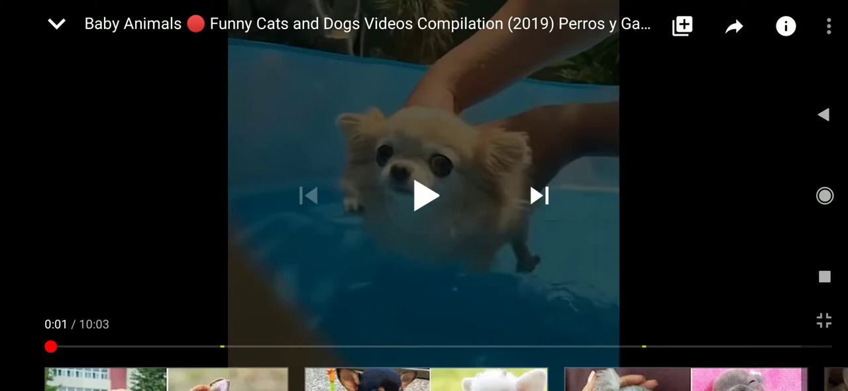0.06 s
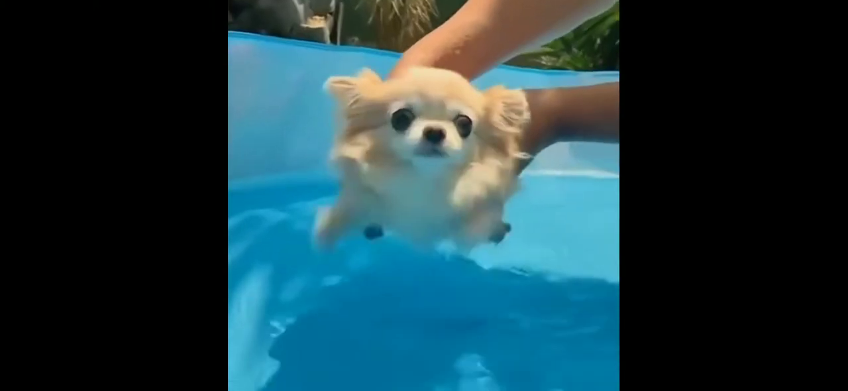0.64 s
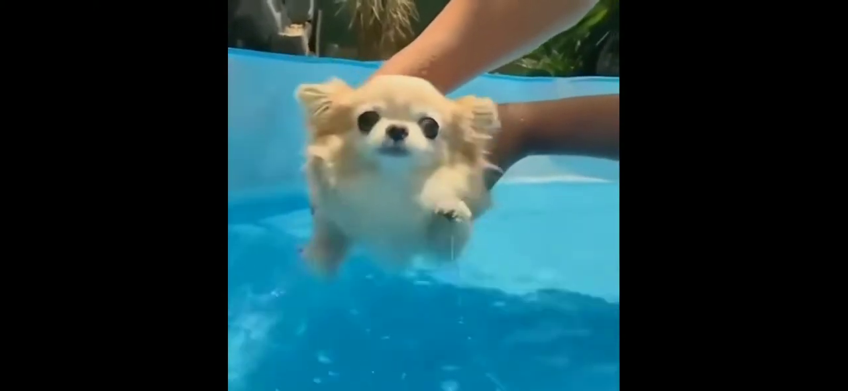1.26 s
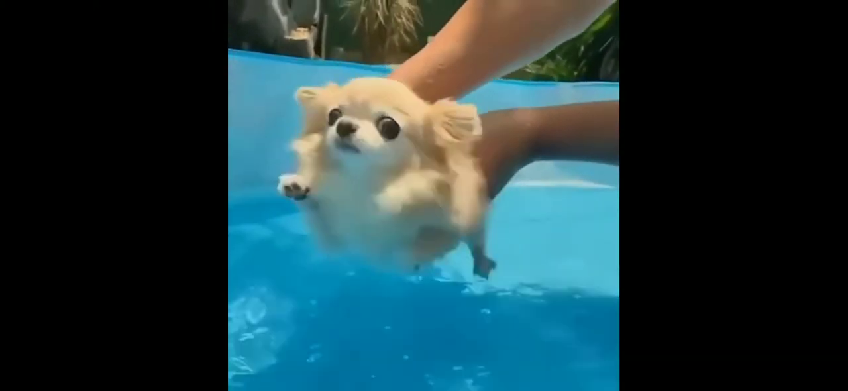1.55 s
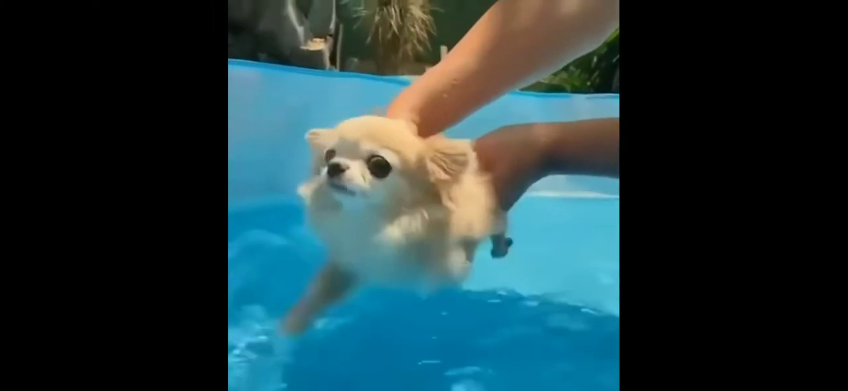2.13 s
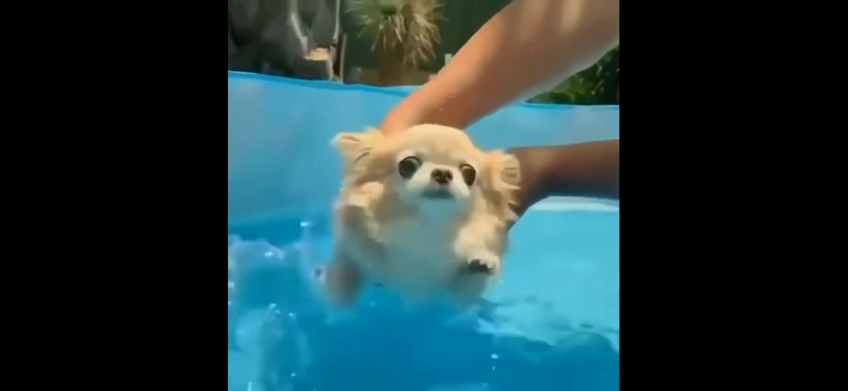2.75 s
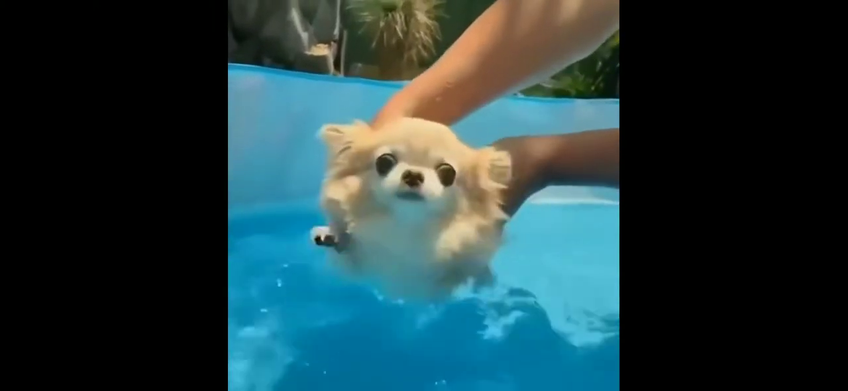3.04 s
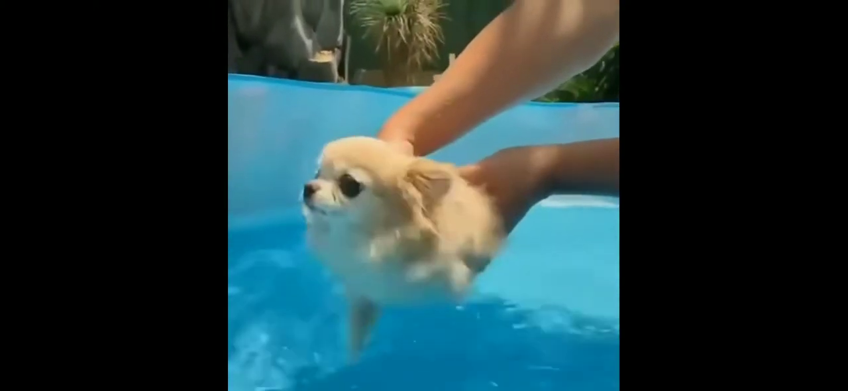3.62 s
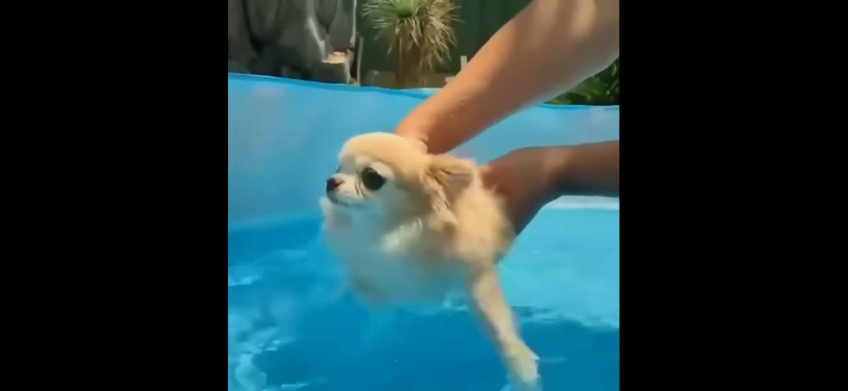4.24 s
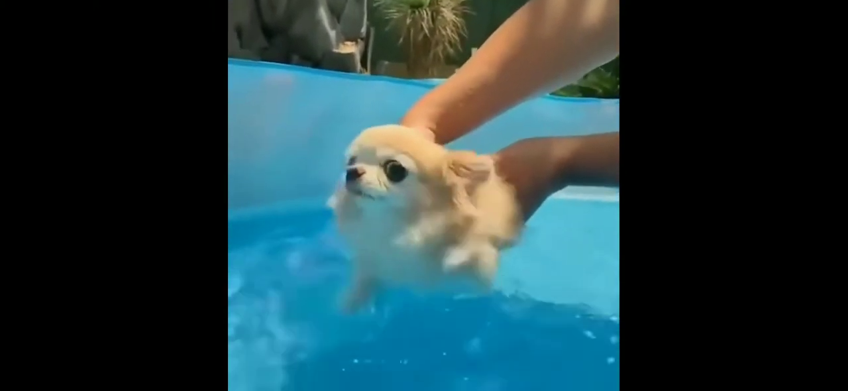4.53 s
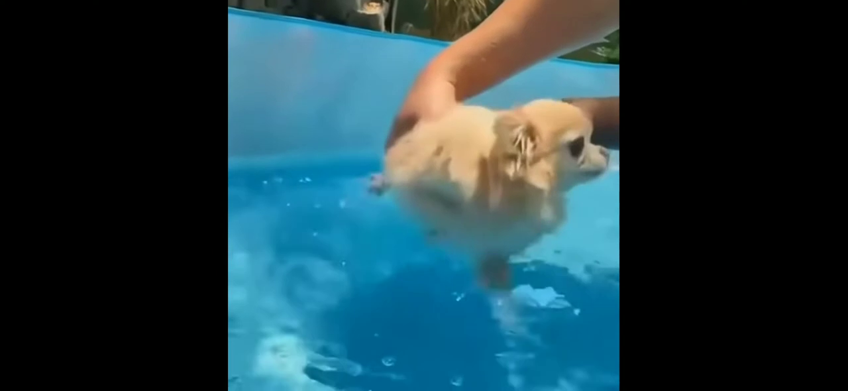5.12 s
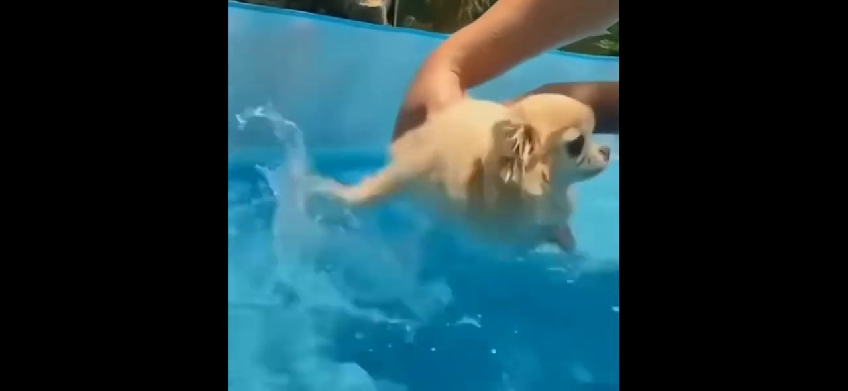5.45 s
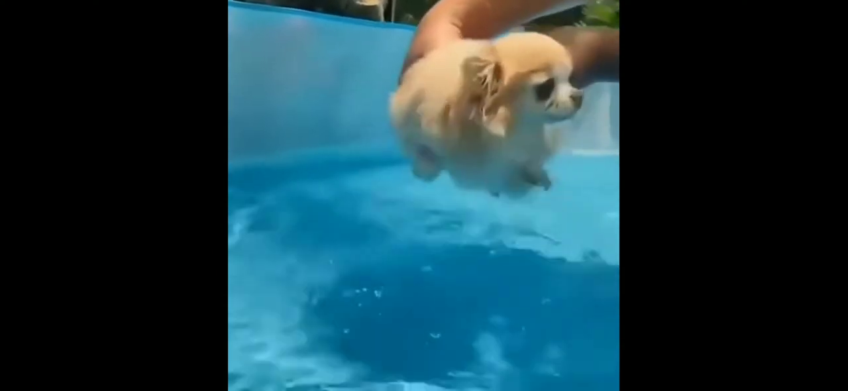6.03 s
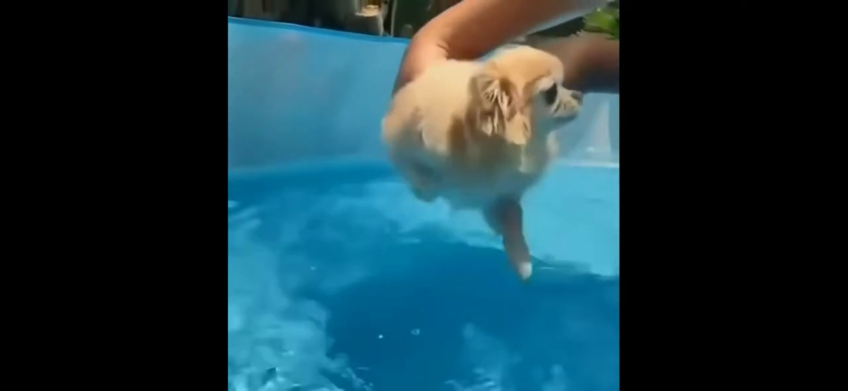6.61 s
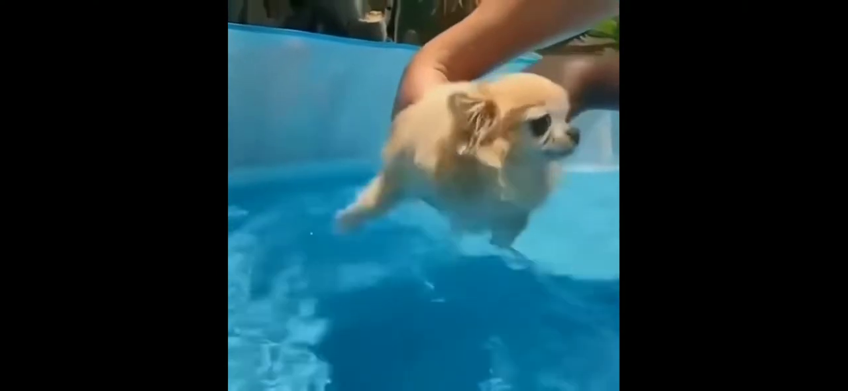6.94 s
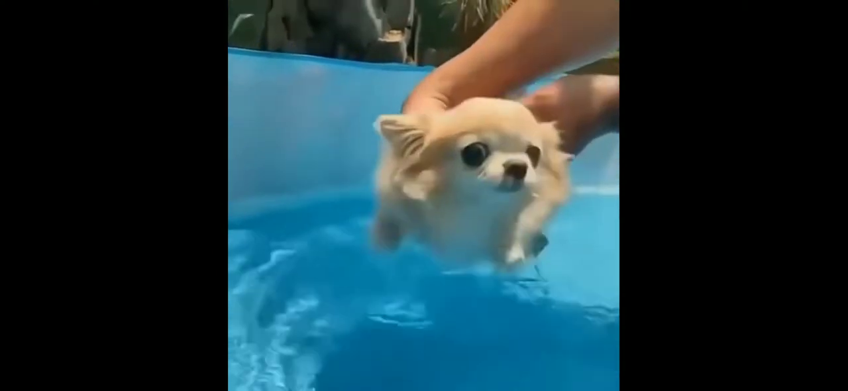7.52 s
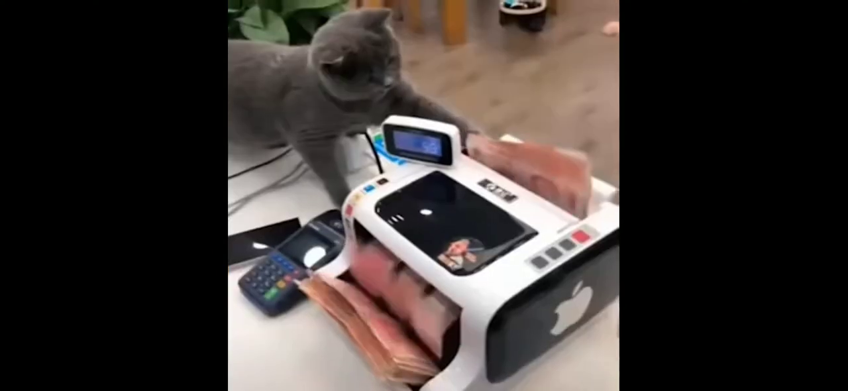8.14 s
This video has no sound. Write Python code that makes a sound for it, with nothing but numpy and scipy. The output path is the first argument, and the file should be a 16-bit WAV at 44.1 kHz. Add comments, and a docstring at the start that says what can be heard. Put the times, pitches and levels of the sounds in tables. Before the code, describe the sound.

Close to the microphone, a small dog paddles at the surface of a garden pool. Its paws make light, irregular slaps, with bubbly plops, falling spray and drips from wet fur. Far traffic and one engine rumble faintly behind. The splashing grows busier past the middle, then eases. Near the end the sound cuts abruptly to a nearby banknote counter, briefly riffling paper over a motor hum.

```python
"""A small dog paddles at the surface of a garden pool, held over the water close to the microphone.
Paws slap, thrown spray falls back, trapped air rings as bubbles and the wet fur drips.
The pool walls answer at once; far behind lie a low traffic rumble and one engine.
At 7.7 s the scene changes abruptly to a banknote counter at close range:
its motor hums while paper riffles through the rollers. One microphone, mono."""
import sys
import numpy as np
from scipy import signal
from scipy.fft import rfft, irfft
from scipy.io import wavfile
from scipy.ndimage import uniform_filter1d

SR = 44100
rng = np.random.default_rng(int(sys.argv[2]) if len(sys.argv) > 2 else 0)


def persist_wave(psi):
    """Save psi, clipped to +-1, as 16-bit WAV."""
    counts = np.round(np.clip(psi, -1, 1) * 32767).astype(np.int16)
    wavfile.write(sys.argv[1], SR, np.atleast_2d(counts).T)


N = 369116
TIME = np.arange(N) / SR


# Paws and flung water hitting the surface, close by: start_s, level_db, t60_s
PAW_SLAPS = [(0.744, -53.5, .023), (0.926, -43.5, .01), (1.029, -40, .022), (1.152, -49.5, 0.032),
             (1.579, -52, 0.033), (1.772, -51, 0.011), (1.866, -53.5, 0.036), (2.2401, -46.5, 0.044),
             (2.423, -48, 0.044), (2.644, -52.5, 0.033), (2.9318, -38, 0.011), (3.234, -44, 0.03),
             (3.636, -53.5, 0.055), (3.691, -51.5, 0.043), (3.812, -52, 0.037), (4.1437, -33, 0.0085),
             (4.217, -48.5, 0.056), (4.45, -49, 0.022), (4.5995, -33.5, 0.02), (4.99, -34.5, 0.02),
             (5.085, -41.5, .044), (5.241, -45.5, 0.048), (5.404, -43, 0.086), (5.518, -39.5, 0.024),
             (5.724, -43.5, .021), (5.758, -43, 0.044), (5.885, -40.5, 0.068), (6.03, -49, .022),
             (6.063, -44, .033), (6.368, -41, 0.017), (6.531, -46, 0.038), (6.931, -51, 0.032),
             (7.251, -48, .042)]

def paw_slaps(tail_db=-25, tail_t60=0.51, attack_s=0.00019, neutral_t60=0.027):
    """A ragged crack as the surface breaks, then a faint tail; longer slaps sound darker."""
    out, t = np.zeros(N), np.arange(SR // 4) / SR
    for start_s, db, t60 in PAW_SLAPS:
        grain = amp(-unit(uniform_filter1d(rng.standard_normal(len(t)), size=60)))
        tilt_db = -5 * np.log2(t60 / neutral_t60)
        burst = coloured(rng.standard_normal(len(t)) * grain, SPRAY_SPECTRUM, tilt_db)
        decay = amp(-60 * t / t60) + amp(tail_db - 60 * t / tail_t60)
        shape = decay * (1 - np.exp(-t / attack_s))
        add(out, start_s, amp(db) * unit(burst * shape) * np.sqrt(2 * np.mean(shape ** 2)))
    return out


# Paw strokes sweeping water aside: start_s, length_s, gurgle_db, spray_db
PAW_STROKES = [(0.767, 0.039, -52.5, -51), (0.967, 0.15, -94, -61), (1.159, .12, -62.5, -60.5),
               (1.336, 0.049, -81, -61), (2.17, 0.05, -60.5, -64.5), (2.274, 0.061, -86, -62),
               (2.49, 0.033, -63, -57), (2.739, 0.074, -66.5, -59), (2.965, 0.033, -71, -54.5),
               (3.135, 0.012, -58, -66), (3.341, 0.031, -55, -60.5), (3.388, 0.023, -50, -56),
               (3.427, 0.071, -78, -56.5), (3.546, 0.039, -83, -60), (3.84, 0.017, -79, -57.5),
               (3.932, 0.013, -62, -58.5), (4.029, 0.046, -52, -55.5), (4.274, 0.066, -55.5, -53.5),
               (4.358, 0.085, -60, -53), (4.738, 0.17, -57, -58.5), (4.935, 0.015, -48.5, -54),
               (5.038, 0.11, -57.5, -61), (5.157, 0.012, -47, -55.5), (5.389, 0.069, -56, -57),
               (5.492, 0.08, -52.5, -57), (5.604, 0.073, -58, -71), (5.666, .06, -48.5, -57),
               (5.83, 0.063, -66, -74), (5.867, 0.17, -53, -58.5), (6.073, 0.061, -50, -57.5),
               (6.447, 0.027, -56, -57), (6.527, 0.047, -61.5, -77), (6.713, 0.033, -56.5, -58.5),
               (6.952, 0.1, -51, -57.5)]

def paw_strokes(rise_s=0.004, close_t60=0.12, flight_s=0.17, flight_spread_s=0.077):
    """Gains of spray and gurgle: a paw digs in, the water closes, spray rains back, the wake settles."""
    spray_power, gurgle_power = np.zeros(N), np.zeros(N)
    t = np.arange(2 * SR) / SR
    onset = np.minimum(t / rise_s, 1)
    fallback = amp(-12) ** 2 * np.exp(-((t - flight_s) / flight_spread_s) ** 2)
    wake = (onset * amp(-18 - 13 * t)) ** 2
    for start_s, length_s, gurgle_db, spray_db in PAW_STROKES:
        sweep = (onset * amp(-60 * np.maximum(t - length_s, 0) / close_t60)) ** 2
        add(spray_power, start_s, amp(spray_db) ** 2 * (sweep + fallback + wake))
        add(gurgle_power, start_s, amp(gurgle_db) ** 2 * sweep + amp(spray_db) ** 2 * wake)
    return np.sqrt(spray_power), np.sqrt(gurgle_power)


# The larger air pockets closed by paws and drops: start_s, pitch_hz, level_db
AIR_POCKETS = [(.736, 2340, -41), (0.778, 2570, -40), (1.079, 2890, -33.5), (1.119, 1314, -46),
               (1.175, 1650, -39), (1.234, 1320, -42.5), (1.255, 748, -34.5), (2.161, 1636, -33.5),
               (2.164, 1577, -33), (2.18, 1756, -41), (2.241, 3260, -36), (2.429, 1856, -40.5),
               (2.541, 3260, -47), (2.63, 880, -51), (2.855, 1464, -52), (2.865, 1006, -41),
               (2.883, 1340, -76), (3.155, 2570, -59), (3.338, 1860, -46), (3.39, 764, -48),
               (3.911, 1376, -52), (4.017, 2840, -41), (4.121, 2530, -30.5), (4.087, 1140, -44),
               (4.133, 1440, -30), (4.146, 3060, -26), (4.202, 3270, -35), (4.3, 2110, -26),
               (4.372, 1543, -38.5), (4.479, 457, -35), (4.532, 1847, -40.5), (4.759, 1000, -33),
               (4.769, 1024, -29), (4.82, 1297, -35), (4.86, 1730, -23.5), (4.944, 634, -39.5),
               (4.999, 1980, -33.5), (5.062, 1210, -37), (5.272, 960, -44), (5.282, 412, -39.5),
               (5.401, 1070, -25), (5.407, 1710, -27), (5.431, 836, -41), (5.516, 1550, -40.5),
               (5.556, 1000, -37), (5.62, 470, -45), (5.696, 940, -38), (5.719, 1574, -41),
               (5.76, 1750, -23.5), (5.791, 1080, -48), (5.845, 545, -57), (5.886, 1067, -31.5),
               (5.976, 1340, -36.5), (6.113, 1083, -37.5), (6.159, 3710, -32.5), (6.497, 1190, -35.5),
               (6.536, 2890, -37.5), (6.592, 3580, -39.5), (6.685, 1120, -44.5), (6.786, 1650, -41.5),
               (6.934, 2570, -41), (6.982, 1000, -40.5), (7.039, 1827, -35.5), (7.214, 237, -35),
               (7.257, 2470, -45.5), (7.401, 3550, -54)]
TYPICAL_HZ, TYPICAL_DB = 1450, -37  # the pocket from which ring times and trail levels are scaled

def plops(trail_count=5, lag_s=0.017, climb_octaves_per_s=20, fade_db_per_s=160):
    """Each air pocket rings and breaks into a trail of small bubbles: the later, the higher and fainter."""
    out = np.zeros(N)
    # each air pocket glides up by its own random share
    rises = 0.442 * np.exp(0.58 * rng.uniform(-1.94, 1, len(AIR_POCKETS)))
    for (start_s, hz, db), rise in zip(AIR_POCKETS, rises):
        add(out, start_s, air_pocket(hz, db, rise))
        for late, detune, glide in rng.standard_normal((trail_count, 3)):
            delay_s = lag_s * abs(late)
            small_hz = hz * 2 ** (0.3 * detune + climb_octaves_per_s * delay_s)
            small_db = -50 + 0.68 * (db - TYPICAL_DB) - fade_db_per_s * delay_s
            add(out, start_s + delay_s, bubble(small_hz, small_db, t60=0.025, rise=0.23 * abs(glide)))
    return out


def air_pocket(hz, db, rise, attack_cycles=0.47):
    """One large bubble: a quickly damped burst, then a quiet after-ring that glides up."""
    size_factor = (hz / TYPICAL_HZ) ** -0.36  # smaller bubbles ring shorter
    excess_db = db - TYPICAL_DB
    burst_t60 = 0.03 * size_factor * 2 ** (-excess_db / 11.5)  # so do violently torn ones
    after_db, after_t60 = -45.5 + 0.21 * excess_db, 0.086 * size_factor
    t = np.arange(int(max(burst_t60, after_t60) * SR)) / SR
    decay = np.maximum(amp(db - 60 * t / burst_t60), amp(after_db - 60 * t / after_t60))
    onset = 1 - np.exp(-t * hz / attack_cycles)
    return decay * onset * np.sin(2 * np.pi * hz * (t + rise * t * t / after_t60 / 2))


def bubble(hz, db, t60, rise, attack_s=0.00014):
    """Trapped air rings and dies; its pitch climbs by the share `rise` as it nears the surface."""
    t = np.arange(int(max(t60, 0.005) * SR)) / SR
    envelope = amp(db - 60 * t / t60) * (1 - np.exp(-t / attack_s))
    return envelope * np.sin(2 * np.pi * hz * (t + rise * t * t / t60 / 2))


# Spectrum of splashing water at close range: frequency_hz, relative_db
SPRAY_SPECTRUM = [(500, -28), (1500, -6.5), (3500, 3.5), (6000, 3.5), (10000, -1), (13700, 0), (14500, -42),
                  (16000, -44)]

def spray(fizz_db=-5, drops_db=-6, ring_cycles=18):
    """Fine droplets land, each with a brief pitched tick, over a soft fizz of foam."""
    fizz = coloured(rng.standard_normal(N) * amp(2 * wander(90)), SPRAY_SPECTRUM)
    drops = np.zeros(N)
    for hz in np.linspace(2200, 13500, 30):
        droplet = unit(bubble(hz, 0, ring_cycles / hz, rise=0.023, attack_s=0.00099))
        drops += signal.oaconvolve(ticks(per_s=16, spread_db=4), droplet)[:N]
    return amp(fizz_db) * fizz + amp(drops_db) * coloured(drops, SPRAY_SPECTRUM)


def patter(relative_db=-4, t60=0.013):
    """Drops that trap no air land as dry, broad ticks."""
    t = np.arange(SR // 40) / SR
    power = signal.oaconvolve(ticks(per_s=70, spread_db=3) ** 2, amp(-120 * t / t60))[:N]
    return amp(relative_db) * coloured(rng.standard_normal(N) * np.sqrt(abs(power)), SPRAY_SPECTRUM)


# Spectrum of the water churned around the paws: frequency_hz, relative_db
GURGLE_SPECTRUM = [(300, -30), (600, -10.5), (1050, 3), (2000, 3), (3200, 1.5), (5000, -10.5), (9000, -50)]

def gurgle(swarm_db=-2, wash_db=-8, ring_cycles=28, sizes=40):
    """A swarm of small bubbles in a wash of torn water; smaller ones ring higher and shorter."""
    swarm = np.zeros(N)
    for hz, rise in zip(np.geomspace(450, 5000, sizes), rng.uniform(0, 0.35, sizes)):
        ring = hz * bubble(hz, 0, ring_cycles / hz, rise)
        swarm += signal.oaconvolve(ticks(per_s=30, spread_db=3.2), ring)[:N]
    return amp(swarm_db) * coloured(swarm, GURGLE_SPECTRUM) + amp(wash_db) * noise(GURGLE_SPECTRUM)


def cavities(splash, depth_db=3.5):
    """Cavities of ever changing shape give each instant of a splash its own colour."""
    spectra = signal.stft(splash, nperseg=256, noverlap=192)[2]
    patches = uniform_filter1d(rng.standard_normal(spectra.shape), size=3, axis=0)  # across frequency
    patches = uniform_filter1d(patches, size=13, axis=1)  # across time
    gain = unit(amp(depth_db * unit(patches)))
    return signal.istft(spectra * gain, nperseg=256, noverlap=192)[1][:N]


def fur_drips(from_s=0.8, to_s=7.5, centre_hz=3200, count=75):
    """Water runs off the wet fur into the pool in small, clear plinks."""
    out = np.zeros(N)
    for start_s in rng.uniform(from_s, to_s, count):
        octaves, force = rng.standard_normal(2)
        hz = centre_hz * 2 ** (0.35 * octaves)
        db = -53.5 + 3.5 * min(force, 1)
        add(out, start_s, bubble(hz, db, t60=0.026, rise=0.075))
    return out


# Echoes reaching the microphone from the sides of the pool: delay_s, gain_db
POOL_ECHOES = [(.0027, -45), (.0058, -22.5), (0.01, -15.5)]
# Decay of the open yard: frequency_hz, t60_s
YARD_DECAY = [(1500, 0.048), (14000, 0.05)]

def garden(direct, tail_db=-11, reflections_per_s=2500):
    """The pool walls answer at once, and the yard adds a thin, short tail."""
    taps = rng.choice([-1., 1.], SR // 3) * (rng.random(SR // 3) < reflections_per_s / SR)
    hz, t, spectra = signal.stft(taps, SR, nperseg=256)
    decay = amp(-60 * t / read(YARD_DECAY, hz)[:, None])
    tail = signal.istft(spectra * decay, SR, nperseg=256)[1]
    out = direct + amp(tail_db) * signal.fftconvolve(direct, tail / np.linalg.norm(tail))[:N]
    for delay_s, db in POOL_ECHOES:
        add(out, delay_s, amp(db) * direct)
    return out


# Banknotes flicked into the stacker, close to the microphone: time_s, level_db
NOTE_FLICKS = [(7.759, -47.5), (7.804, -41.5), (7.864, -45), (7.945, -45.5), (8.007, -40.5), (8.069, -44.5),
               (8.189, -41.5), (8.231, -41), (8.252, -40), (8.293, -44.5), (8.348, -41)]
# Spectrum of paper rubbing on the rollers: frequency_hz, relative_db
PAPER_SPECTRUM = [(400, -12), (1050, -10), (1600, -2.5), (2300, -3.5), (3000, -5.5), (4200, 3),
                  (5100, -0.5), (6300, 1), (8000, -4), (10500, -12), (12800, -21.5), (13600, -55)]

def banknotes(rush_db, flick_s=0.0073, drag_s=0.021, drag_db=-5):
    """Paper rasps through the rollers in surges; each note is a flick inside a longer, softer drag."""
    power = amp(rush_db) ** 2
    for time_s, db in NOTE_FLICKS:
        flick = np.exp(-((TIME - time_s) / flick_s) ** 2)
        drag = amp(drag_db) ** 2 * np.exp(-((TIME - time_s) / drag_s) ** 2)
        power += amp(db) ** 2 * (flick + drag)
    friction = rng.standard_normal(N) + amp(-7) * unit(ticks(per_s=1500, spread_db=5.3))
    rasp = case_ring(coloured(friction, PAPER_SPECTRUM))
    flutter = amp(1.5 * wander(110))
    return rasp * np.sqrt(power) * flutter


def case_ring(rasp, ring_db=-6, t60=0.028):
    """The case and the stacker ring in many close modes."""
    t = np.arange(SR // 8) / SR
    body = rng.standard_normal(len(t)) * amp(-60 * t / t60)
    ring = signal.fftconvolve(rasp, body / np.linalg.norm(body))[:N]
    return (rasp + amp(ring_db) * ring) / np.hypot(1, amp(ring_db))


# Tones of the counter's motor and rollers: pitch_hz, level_db
MOTOR_TONES = [(100, -57), (213, -72), (337, -64.5), (432, -68.5), (566, -69.5)]

def motor_hum(speed_drift=0.0058):
    """Motor and rollers hum, their tones wavering together with the speed."""
    motor_time = np.cumsum(1 + speed_drift * wander(16)) / SR
    return sum(np.sqrt(2) * amp(db) * np.sin(2 * np.pi * (hz * motor_time + rng.random()))
               for hz, db in MOTOR_TONES)


# Rush of paper through the counter: time_s, level_db
PAPER_RUSH = [(7.704, -44), (7.81, -46.5), (7.89, -52), (8.37, -59)]
# Spectrum of the rattling plastic case: frequency_hz, relative_db
CASE_SPECTRUM = [(20, -16), (90, -12), (210, 1), (430, 0.5), (650, -2), (1100, -6), (2000, -5), (5000, -53)]

def banknote_counter():
    """Paper riffles while the motor hums; the plastic case rattles more under load."""
    rush_db, = follow(PAPER_RUSH)
    paper_and_motor = banknotes(rush_db) + motor_hum()
    rattle_db = -56 + 0.2 * (rush_db - rush_db.min()) + 2 * wander(21)
    return paper_and_motor + amp(rattle_db) * noise(CASE_SPECTRUM)


# One engine, far beyond the garden: time_s, firing_hz, level_db
ENGINE_RUN = [(.1, 53.8, -70), (.53, 61.95, -57), (.8, 53.5, -71), (1.2, 50.85, -55.5), (1.6, 62.6, -63.5),
              (1.7, 68.7, -53), (2.1, 55.17, -50), (2.6, 50.13, -53), (3.2, 48.76, -53), (4.2, 53.5, -73)]
# Spectrum of its exhaust from a distance: frequency_hz, relative_db
EXHAUST_SPECTRUM = [(120, -17), (200, -0.5), (255, 2.5), (310, -2), (420, -23), (800, -53)]

def distant_engine(exhaust_db=-10):
    """The firing of an engine drones at an uneven speed, with a rough exhaust."""
    firing_hz, db = follow(ENGINE_RUN)
    waver = amp(0.5 * wander(7.3))
    firings = np.cumsum(firing_hz + 1.15 * wander(3.1)) / SR
    drone = np.sqrt(2) * waver * np.sin(2 * np.pi * firings)
    return amp(db) * (drone + amp(exhaust_db) * noise(EXHAUST_SPECTRUM))


# Spectrum of far traffic, heard from the poolside: frequency_hz, relative_db
TRAFFIC_SPECTRUM = [(20, -11), (35, -10), (52, -0.5), (74, 3), (95, -3), (160, -6.5), (270, -11),
                    (400, -20.5), (650, -26), (1100, -27), (2500, -38.5), (6500, -45.5), (13800, -47.5),
                    (14800, -85)]

def outdoors(traffic_db=-53):
    """Far traffic rumbles behind the engine, with one dull, low bump."""
    out = distant_engine() + amp(traffic_db) * noise(TRAFFIC_SPECTRUM)
    bump = bubble(hz=52, db=-31, t60=0.17, rise=0, attack_s=0.012)
    add(out, 1.665, bump)
    return out


def amp(db):
    """Decibels to gain."""
    return 10 ** (np.asarray(db) / 20)


def unit(x):
    """Scales to rms 1."""
    return x / np.sqrt(np.mean(x ** 2) + 1e-20)


def read(points, hz):
    """Reads a table on a log-frequency axis."""
    table_hz, value = np.transpose(points)
    return np.interp(np.log(hz + 1), np.log(table_hz + 1), value)


def follow(rows):
    """The columns of a timed table, sample by sample."""
    time_s, *columns = np.transpose(rows)
    return [np.interp(TIME, time_s, column) for column in columns]


def add(mix, start_s, sound):
    """Mixes a sound in at start_s."""
    part = mix[max(round(start_s * SR), 0):][:len(sound)]
    part += sound[:len(part)]


def coloured(x, spectrum, tilt_db=0):
    """Filters x by a spectrum, tilted by tilt_db an octave about 4 kHz, to rms 1."""
    hz = np.fft.rfftfreq(len(x), 1 / SR)
    octaves = np.log2(np.maximum(hz, 500) / 4000)
    return unit(irfft(rfft(x) * amp(read(spectrum, hz) + tilt_db * octaves), len(x)))


def noise(spectrum):
    """Steady noise of this spectrum, at rms 1."""
    return coloured(rng.standard_normal(N), spectrum)


def wander(rate_hz):
    """Smooth random drift up to about rate_hz, at rms 1."""
    hz = np.fft.rfftfreq(N, 1 / SR)
    return unit(irfft(rfft(rng.standard_normal(N)) / (1 + (hz / rate_hz) ** 4), N))


def ticks(per_s, spread_db):
    """Sparse clicks of either sign, many small and a few large."""
    out, chance = np.zeros(N), rng.uniform(-1, 1, N) * SR / per_s
    at = np.flatnonzero(abs(chance) < 1)
    size = np.minimum(-np.log(abs(chance[at])), 4)  # exponential spread of sizes
    out[at] = np.sign(chance[at]) * amp(spread_db * size)
    return out


# Spans in which all sound from the poolside drops out: start_s, end_s
POOL_GAPS = [(0, .054), (.076, .097), (.14, .161), (7.685, 8.4)]

def scene(counter_start_s=7.704):
    """At the poolside, a moment of silence, then beside the counter."""
    spray_gain, gurgle_gain = paw_strokes()
    splashes = cavities(paw_slaps() + spray_gain * (spray() + patter()) + gurgle_gain * gurgle())
    poolside = garden(plops() + fur_drips() + splashes) + outdoors()
    heard = 1. - sum((TIME >= start_s) & (TIME < end_s) for start_s, end_s in POOL_GAPS)
    poolside *= uniform_filter1d(heard, size=30)
    return (poolside + banknote_counter() * (TIME > counter_start_s))[None]


def record(dry, cutoff_hz=16200):
    """The band limit of the recorder behind the microphone."""
    lowpass = signal.firwin(511, cutoff_hz, window=("kaiser", 9), fs=SR)
    return signal.oaconvolve(dry, lowpass[None], "same")


dry = scene()
out = record(dry)
persist_wave(out)
```